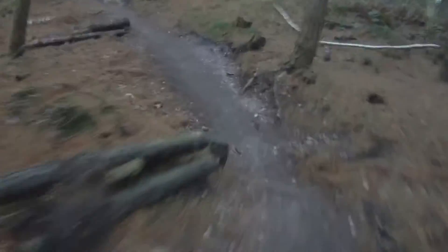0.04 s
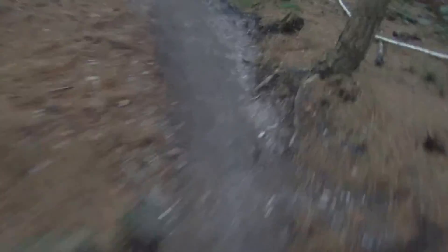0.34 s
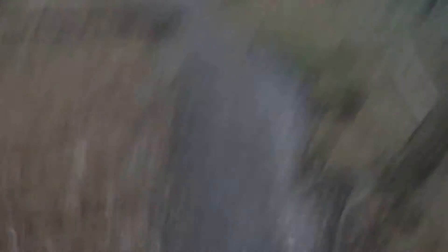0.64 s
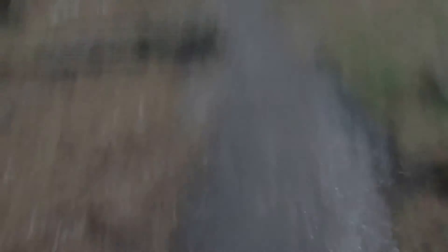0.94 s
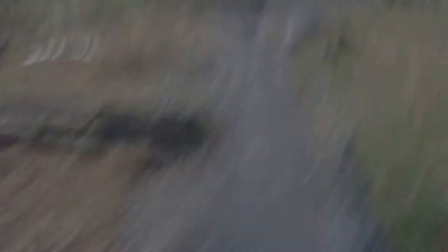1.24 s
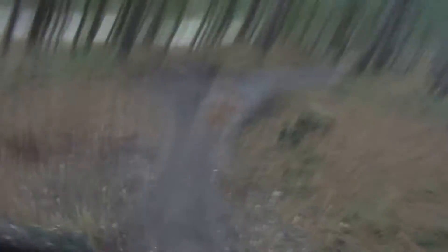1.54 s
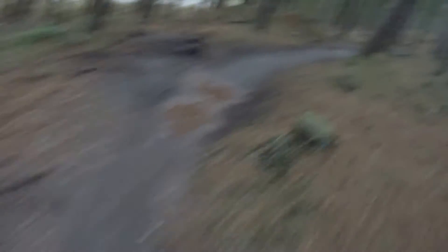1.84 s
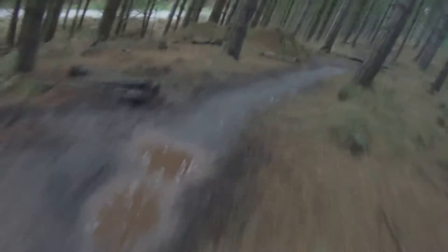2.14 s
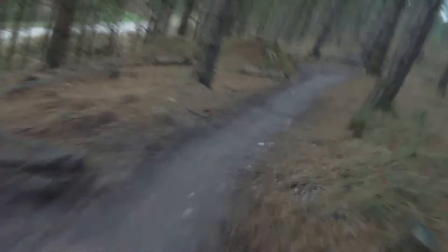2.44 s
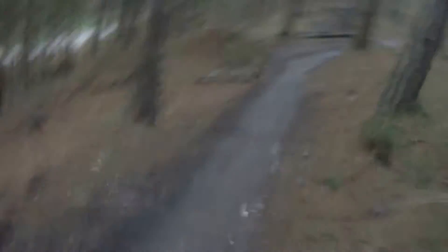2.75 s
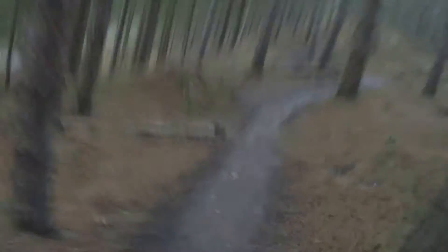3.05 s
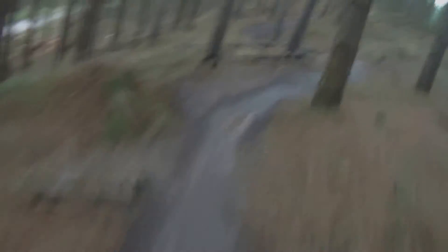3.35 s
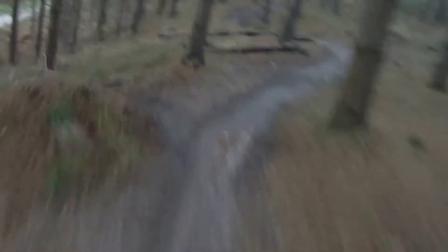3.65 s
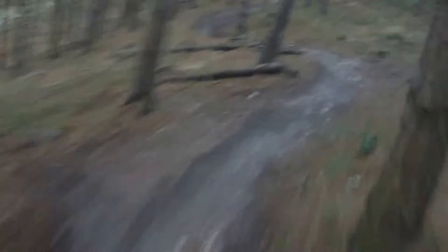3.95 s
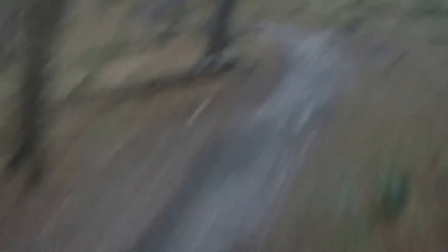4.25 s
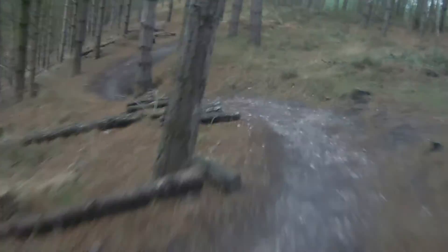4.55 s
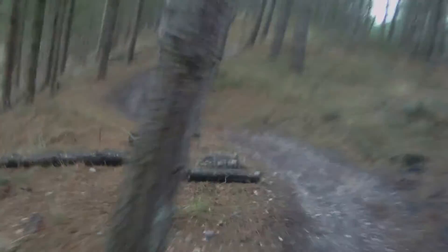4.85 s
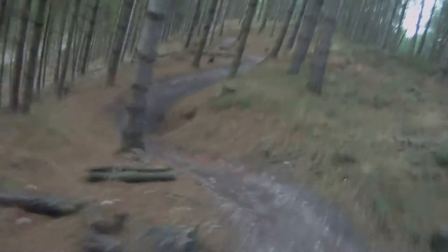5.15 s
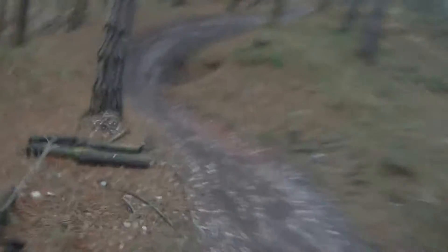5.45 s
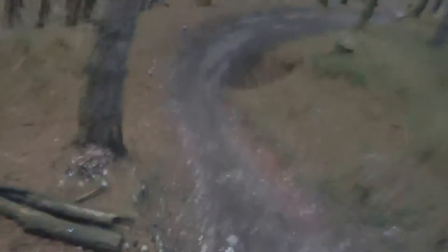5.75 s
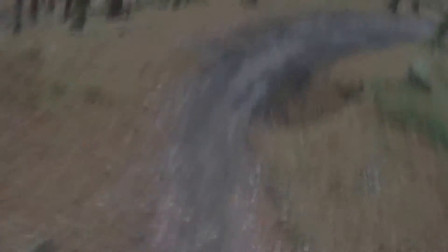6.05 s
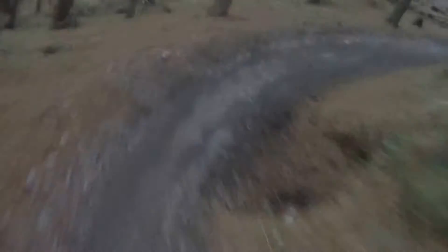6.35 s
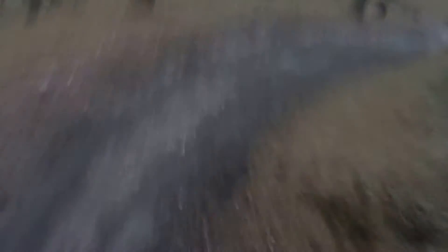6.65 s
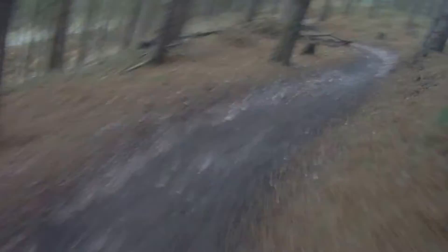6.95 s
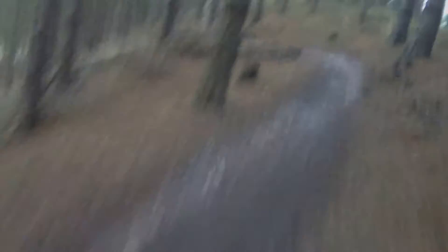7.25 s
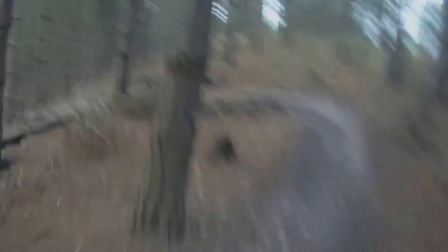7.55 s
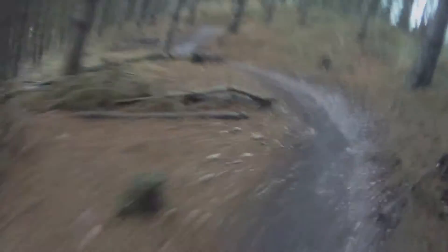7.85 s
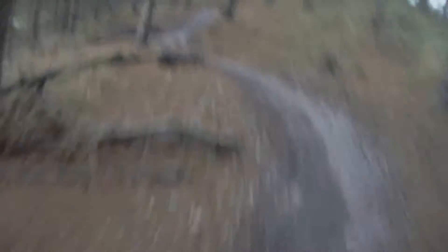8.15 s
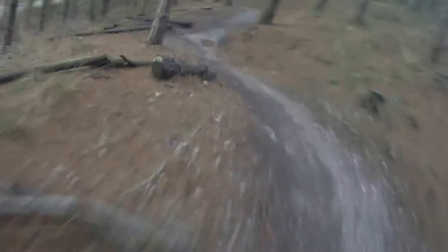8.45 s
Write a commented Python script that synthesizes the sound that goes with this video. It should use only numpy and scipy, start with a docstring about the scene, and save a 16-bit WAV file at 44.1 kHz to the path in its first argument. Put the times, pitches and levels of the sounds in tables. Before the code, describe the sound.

A mountain bike rides fast over a dirt trail, heard from inside a plastic camera housing. Hollow knocks and sharp clacks from the mount come irregularly, each followed by chattering loose parts, over a soft, muffled rumble of tyres and wind with faint gritty hiss.

From about 0.6 to 1.1 seconds comes the loudest clatter, with the chain slapping the frame and jingling brightly. Lighter knocks and jingles continue until 1.8. After a short lull, the tyres scrub through grit at 2.5, and another run of knocks lasts from 2.6 to 3.5. Only lighter, scattered taps follow until about 5.2, when hard knocking returns, densest from 5.8 to 6.6. The rumble swells between 6 and 7.2, with a strong knock at 7.1. Faint grit hiss follows, and a last cluster of clacks runs from about 7.9 to 8.5 seconds.

```python
"""On a dirt trail, a mountain bike runs fast, heard from inside a plastic camera housing on its mount.
Bumps make the mount knock and often rebound; each impact excites the housing's heavily damped modes.
Loose parts chatter after the jolts, and the chain slaps the frame, jingles and rings the sprockets.
Underneath runs broadband noise: the muffled rumble of tyres and wind, and the hiss of grit."""
import sys
import numpy as np
from scipy import signal
from scipy.fft import rfft, irfft
from scipy.io import wavfile
from scipy.ndimage import uniform_filter1d, minimum_filter1d

SR = 44100
rng = np.random.default_rng(int(sys.argv[2]) if len(sys.argv) > 2 else 0)


def int16_out(signal):
    """Quantize to a 16-bit WAV file."""
    q = np.round(np.clip(np.atleast_2d(signal).T, -1, 1) * 32767)
    wavfile.write(sys.argv[1], SR, q.astype(np.int16))


N = 379260

# normal modes of the housing, in three registers: (frequency [Hz], level [dB], decay time T60 [s])
BODY_MODES = [(177, -12.5, 0.088), (470, -20.5, 0.027), (671, -3.5, 0.028), (867, -1, 0.022),
              (1250, -9.5, 0.013), (1438, -1.5, 0.02), (1558, 1, 0.021)]  # low, hollow knock
SHELL_MODES = [(2074, -10.5, 0.02), (2340, -20, 0.032), (2645, -0.5, 0.011), (3080, 0.5, .014),
               (3585, -5, 0.0099), (4380, -6.5, .011)]  # clack
TICK_MODES = [(5104, -1, 0.0088), (6280, -0.5, 0.006), (7360, -2, 0.0047), (8200, -1.5, 0.0053),
              (9180, 0, 0.0034), (11400, -33, 0.004), (13800, -18, 0.0046)]  # bright contact tick


def undb(db):
    """Amplitude ratio of a level in decibels."""
    return 10 ** (np.asarray(db) / 20)


def unit(x):
    """Normalisation to rms 1."""
    return x / np.sqrt(np.mean(x ** 2) + 1e-18)


def band(x, lo_hz, hi_hz, order=2):
    """Causal band-pass filtering."""
    edges_hz = [lo_hz, min(hi_hz, SR / 2 - 1000)]
    return signal.sosfilt(signal.butter(order, edges_hz, "band", fs=SR, output="sos"), x)


def colour(x, points):
    """Spectral shaping by points (frequency [Hz], relative level [dB]), at rms 1."""
    hz, db = np.transpose(points)
    f = np.maximum(np.arange(N // 2 + 1) * SR / N, 1)
    gain = undb(np.interp(np.log(f), np.log(hz), db))
    low_cut = np.minimum(f / hz[0], 1) ** 2
    return unit(irfft(rfft(x) * gain * low_cut, N))


def flicker(rate):
    """Random modulation: values held for 1 / rate seconds and smoothed twice, at rms 1."""
    hold = int(SR / rate)
    steps = np.repeat(rng.standard_normal(N // hold + 1), hold)
    return unit(uniform_filter1d(uniform_filter1d(steps, hold), hold)[:N])


def grains(rate, spread_db):
    """Shot noise: randomly timed impulses of uneven size, at rms 1."""
    impulses = (rng.random(N) < rate / SR) * rng.choice([-1, 1], N)
    return unit(impulses * undb(spread_db * np.clip(rng.standard_normal(N), -2, 2)))


def resonate(x, modes):
    """Forced vibration: x drives resonators (frequency [Hz], peak gain [dB], T60 [s])."""
    out = 0
    for hz, db, t60 in modes:
        radius = undb(-60 / (t60 * SR))
        pole = radius * np.exp(2j * np.pi * hz / SR)
        out = out + undb(db) * 2 * (1 - radius) * signal.lfilter([1], [1, -pole], x).real
    return out


def trail():
    """Transmission and resonance: tyres and wind rumble through the housing; grit sets it humming."""
    # course of the tyre and wind noise: (time [s], relative level [dB])
    ride = [(0.0, -56), (0.57, -60), (0.93, -51), (1.15, -61), (1.41, -58.5), (1.7, -54.5), (2.56, -53.5),
            (3.19, -58), (4.6, -57.5), (4.96, -62.5), (5.87, -60.5), (5.96, -55.5), (6.47, -48.5),
            (7.14, -48.5), (7.86, -55), (8.6, -59.5)]
    # spectra of the rumble and the grit: (frequency [Hz], relative spectral density [dB])
    rumble_spectrum = [(25, -13), (85, -2), (200, -2.5), (400, -3.5), (520, -2), (700, 0.5), (1100, -15.5),
                       (1900, -19.5), (2900, -22.5), (5000, -29.5), (12000, -56)]
    grit_spectrum = [(1000, -6.5), (2700, -1.5), (4200, -1.5), (5100, -5), (6200, 3.5), (7500, -0.5),
                     (9500, -2), (12000, -7.5), (15000, -9)]
    # tyres scrubbing through loose grit: (start [s], duration [s], level [dB])
    scrubs = [(2.505, 0.2, -54), (3.025, .1, -69.5), (4.107, 0.24, -70.5), (4.62, 0.12, -68),
              (7.38, 1, -63)]
    t = np.arange(N) / SR
    ride_db = np.interp(t, *np.transpose(ride))
    rumble = colour(rng.standard_normal(N), rumble_spectrum) * undb(ride_db + flicker(rate=22) + 5)
    grit = colour(rng.standard_normal(N) + 0.55 * grains(rate=520, spread_db=7.5), grit_spectrum)
    grit *= undb(-53.5 + 0.27 * ride_db + 1.2 * flicker(rate=24))  # follows the rumble weakly
    spray = colour(rng.standard_normal(N) + grains(rate=630, spread_db=8.5), grit_spectrum)
    spray *= undb(1.8 * flicker(rate=40))
    attack_s, release_s = 0.03, 0.22
    scrub = np.zeros(N)
    for start, duration, db in scrubs:
        rise = np.clip((t - start) / attack_s, 0, 1)
        fall = np.exp(-np.maximum(t - start - duration, 0) / release_s)
        scrub += undb(db) * rise * fall
    hiss = grit + scrub * band(spray, lo_hz=800, hi_hz=9500, order=1)
    return rumble + hiss + 2.1 * resonate(hiss, BODY_MODES + SHELL_MODES)


def chatter(jolts, rate=200, span_s=0.026, follow=0.77, rest_db=-58.5, spread_db=6, count=2400):
    """Rattling: loose parts tap at random, lightly all the time and harder while each jolt settles."""
    span = int(span_s * SR)
    power = uniform_filter1d(uniform_filter1d(jolts ** 2, span), span)
    # delayed, since the parts are thrown up first and land later
    power = np.abs(np.pad(power, (span // 2, 0))[:N]) + undb(rest_db) ** 2
    scatter = rng.standard_normal((count, 3))
    times = np.cumsum(rng.exponential(1 / rate, count))
    shake_db = follow * 10 * np.log10(np.interp(times, np.arange(N) / SR, power))
    tap_db = shake_db + spread_db * np.clip(scatter[:, 0], -2, 2)
    levels = tap_db[:, None] + [-29, -34, -39] + 2 * scatter  # body, shell, tick
    return housing(np.column_stack([times, levels])[times < N / SR])


def rings(modes, count, scatter_db, detune, crack, crack_t60, band_hz):
    """Free decay, one per blow: each contact point weights the modes anew and adds a noisy crack."""
    t = np.arange(2048) / SR
    ring = np.zeros((count, len(t)))
    for k, (hz, db, t60) in enumerate(modes):
        size, shift, phase = rng.standard_normal((count, 3)).T[:, :, None]
        # neighbouring modes start in opposite directions, so the ring takes a moment to build
        swing = (-1) ** k * np.cos(2 * np.pi * hz * (1 + detune * shift) * t + 0.46 * phase)
        ring += undb(db + scatter_db * size - 60 * t / t60) * swing
    noise = rng.standard_normal(ring.shape) * undb(-60 * t / crack_t60)
    ring = unit(band(ring, *band_hz)) + crack * unit(band(noise, *band_hz))
    energy = np.sum(ring ** 2, axis=1, keepdims=True)
    return ring / np.sqrt(energy / (SR / 200))  # the energy of 5 ms at rms 1


def housing(blows):
    """Modal superposition: blows (time [s], body [dB], shell [dB], tick [dB]) ring the housing."""
    times, body_db, shell_db, tick_db = np.transpose(blows)
    count = len(times)
    body = rings(BODY_MODES, count, scatter_db=2.2, detune=0.029,
                 crack=0.22, crack_t60=0.023, band_hz=(387, 1750))
    shell = rings(SHELL_MODES, count, scatter_db=2.2, detune=0.033,
                  crack=0.3, crack_t60=0.02, band_hz=(1800, 4730))
    tick = rings(TICK_MODES, count, scatter_db=4.5, detune=0.035,
                 crack=0.31, crack_t60=0.0081, band_hz=(4500, 13200))
    # a contact with little tick is a soft one: it loses its very top
    soft = np.clip((shell_db - tick_db) / 12, 0, 1)[:, None]
    tick = (1 - soft) * tick + soft * np.sqrt(2) * uniform_filter1d(tick, size=3, axis=1)
    sounds = body * undb(body_db)[:, None] + shell * undb(shell_db)[:, None]
    sounds += tick * undb(tick_db)[:, None]
    out = np.zeros(N + sounds.shape[1])
    for start, sound in zip(np.clip(times * SR, 0, N - 1).astype(int), sounds):
        out[start:start + len(sound)] += sound
    return out[:N]


def contact(times, strength_db, hardness_db, hollow_db=0):
    """Energy partition among modes: light blows are mostly hollow body, strong ones mostly clack."""
    body_db = -11.5 + 0.61 * strength_db + hollow_db
    return np.column_stack([times, body_db, strength_db, strength_db + hardness_db])


def mount_blows():
    """Impact and elastic rebound: the mount hits its stop, and at times the opposite stop just after."""
    # knocks of the mount: (time [s], strength [dB], tick over shell [dB], rebound delay [ms])
    knocks = [(0.259, -52, -25, -0.5), (0.5755, -22.5, -4, 6.5), (0.594, -35, -7, 0), (0.704, -17, -22, 0),
              (0.7245, -38, -15, 0), (0.8301, -17, -8, 0), (0.8598, -12.5, -11.5, 0), (0.8799, -30, -12, 0),
              (0.889, -16.5, -21.5, 0), (0.957, -27, 5.5, 0), (0.9887, -12, -3.5, 0),
              (0.9998, -18, -15, 4.5), (1.0561, -4.5, -4.5, 4), (1.068, -20, -9, 0), (1.1027, -11.5, -8, 5),
              (1.2595, -33.5, -18, 7.5), (1.2987, -43.5, -2, 0), (1.4182, -34, -16, 0),
              (1.4437, -28, 2, 1.5), (1.455, -35, -11, 0), (1.5266, -23, -16, 6.5), (1.584, -23.5, -6.5, 6),
              (1.6064, -28, -1.5, 0), (1.7681, -21, -18, 0), (1.7723, -16, -10.5, 1),
              (1.7883, -30, -1.5, 0), (1.9467, -44, -5.5, 0), (2.0449, -32, 2, 0),
              (2.6184, -31.5, -27.5, 0), (2.6344, -24, -5, 0), (2.6395, -12, -7.5, 0),
              (2.6571, -29, -26, 0), (2.7059, -41, -2, 0), (2.7934, -26.5, -33, 0), (2.8135, -22, -31, 0),
              (2.8421, -34.5, -18.5, 9.5), (2.882, -21, -5.5, 0), (3.0035, -22.5, -9, 0),
              (3.0221, -21, -24, 5), (3.0687, -44, -3, 0), (3.1242, -26.5, -28.5, 0.5),
              (3.2714, -39, -6.5, 0), (3.41, -33.5, -7.5, 0), (3.4207, -23, -9, 0), (3.4463, -30, -20, 0),
              (3.4545, -25, -16, 6.5), (3.51, -25.5, -28, 0), (3.5208, -21.5, -10.5, 0),
              (3.7243, -48.5, 1.5, 2), (3.7578, -42, -2.5, 0), (4.0849, -36, 1, 0.5),
              (4.4164, -41.5, -5.5, 0), (4.4496, -41.5, -22, 0), (4.5085, -46, -7, 0),
              (4.5588, -32, -19, 0), (4.572, -33, -6.5, 0.5), (4.7768, -34, -1.5, 0),
              (4.8047, -33, -4.5, 0), (4.9773, -45, -24.5, 0), (5.0745, -44.5, -9, 1),
              (5.1916, -36, -32, 0), (5.2045, -40.5, -22, 0), (5.2313, -28.5, -18.5, 7),
              (5.2693, -18.5, -27.5, 3.5), (5.3181, -20, -6.5, -0.5), (5.3359, -40, -20, -0.5),
              (5.3542, -20.5, -13, 6), (5.3966, -47, 1.5, 0), (5.4657, -35, -2.5, -1.5),
              (5.7184, -36.5, -28, 0), (5.7559, -33.5, -4, 0), (5.806, -10.5, -8, 5.5),
              (5.8448, -29.5, 0.5, 0.5), (5.8622, -29.5, -20, 0), (5.9067, -27.5, -6.5, 0),
              (5.9247, -15, -12, 5), (5.9804, -12.5, -7.5, 4.5), (6.02, -33, 1.5, 0.5),
              (6.105, -29, -10, 0), (6.1271, -12.5, -8, 3.5), (6.1741, -29, -0.5, 5.5),
              (6.1913, -26.5, -11, 0), (6.2117, -35, -18, 0), (6.2224, -18.5, -26, 5.5),
              (6.2605, -29.5, -3, 0), (6.304, -20.5, -11, 4.5), (6.3305, -30.5, -19, 0),
              (6.3433, -35, -8.5, 0), (6.4446, -30, -5.5, 4), (6.512, -43, -0.5, 1), (6.565, -18.5, -17, 0),
              (6.5998, -22.5, -4.5, -1), (7.0182, -35.5, -3, -1), (7.1158, -13, -11, 0),
              (7.1364, -21, -25, 5), (7.1518, -38, -24, -0.5), (7.1681, -35, -1.5, 0),
              (7.2242, -24.5, -28.5, 0.5), (7.488, -36.5, -6.5, 0), (7.5693, -42.5, -2.5, -1.5),
              (7.9473, -16, -4.5, 9), (7.9662, -22, -28, 1), (7.9943, -25.5, -3.5, 0),
              (7.9978, -14.5, -11, 0), (8.032, -31.5, -2, 0), (8.048, -29, -19, 4.5), (8.1374, -44, -3, 0),
              (8.2183, -29, -1.5, -1.5), (8.2501, -16.5, -13, 5.4), (8.2848, -31.5, 1.5, 0),
              (8.4213, -25.5, -11, 0), (8.4362, -28.5, -2.5, 0), (8.5939, -37, -6, 0)]
    times, strength_db, hardness_db, delay_ms = np.transpose(knocks)
    rebound_db = -12.5 + 0.66 * strength_db
    rebounds = contact(times + delay_ms / 1000, rebound_db, hardness_db=-3, hollow_db=2.5)
    return np.vstack([contact(times, strength_db, hardness_db), rebounds[delay_ms > 1]])


def frame_thud(blows, hz=135, t60=0.04):
    """Damped oscillation: each blow also pushes the frame, which answers with a faint, low thud."""
    times, body_db = blows[:, :2].T
    push = np.zeros(N)
    push[np.clip(times * SR, 0, N - 1).astype(int)] = undb(body_db - 21)
    t = np.arange(int(t60 * SR)) / SR
    swing = np.sin(2 * np.pi * hz * t) * undb(-60 * t / t60)
    return band(signal.fftconvolve(push, swing)[:N], lo_hz=90, hi_hz=400)


def chain_slaps():
    """Hard impact: the chain hits the frame and excites mostly the highest modes."""
    # slaps of the chain: (time [s], level [dB])
    slaps = [(0.6081, -26.5), (0.616, -37.5), (0.6553, -13), (0.666, -23.5), (0.684, -19.5), (0.695, -28.5),
             (0.7015, -17.5), (0.733, -35), (0.7426, -29), (0.8847, -20), (0.898, -28.5), (0.9128, -19.5),
             (0.929, -35.5), (0.945, -32), (0.9654, -30), (0.9782, -23.5), (1.043, -26.5), (1.089, -36),
             (1.6412, -31), (1.6678, -34), (6.06, -42)]
    times, tick_db = np.transpose(slaps)
    body_db, shell_db = tick_db - 22, tick_db - 9.5
    return housing(np.column_stack([times, body_db, shell_db, tick_db]))


def chain_jingle(ramp_s=0.0066, click_decay_s=0.00044):
    """Random collisions: links click together in quick, bright runs, each click a tiny noise burst."""
    # spells of chain shaking: (start [s], end [s], level [dB])
    shakes = [(0.625, 0.654, -44), (0.72, 0.784, -43.5), (.9, 0.974, -43), (1.025, 1.075, -33),
              (1.343, 1.4, -56.5), (1.487, 1.509, -39.5), (1.554, 1.684, -47), (3.065, 3.172, -55),
              (8.33, 8.386, -55.5)]
    t = np.arange(N) / SR
    shake = sum(undb(db) * np.clip(np.minimum(t - start, end - t) / ramp_s, 0, 1)
                for start, end, db in shakes)
    clicks = np.abs(grains(rate=380, spread_db=3))
    bursts = signal.lfilter([1], [1, -np.exp(-1 / (click_decay_s * SR))], clicks)
    links = rng.standard_normal(N) * bursts
    return shake * unit(band(links + resonate(links, TICK_MODES), lo_hz=4480, hi_hz=12500))


def sprockets(chain):
    """Sympathetic resonance: the chain sets the sprockets ringing."""
    # sprocket modes: (frequency [Hz], peak gain [dB], decay time T60 [s])
    sprocket_modes = [(3800, 2, 0.073), (4200, 2.5, .012)]
    return resonate(chain, sprocket_modes)


def scene():
    """Superposition: all sound reaches the microphone through the housing, so both channels are alike."""
    blows = mount_blows()
    knocks = housing(blows)
    slaps = chain_slaps()
    loose_parts = chatter(knocks + slaps)
    chain = slaps + chain_jingle()
    mono = knocks + frame_thud(blows) + loose_parts + chain + sprockets(chain) + trail()
    return np.array([mono, mono])


def record(dry, top_hz=15400):
    """Peak limiting: a very fast limiter holds the hardest knocks at full scale; the top is then cut."""
    gain = 1 / np.maximum(np.abs(dry), 1)
    gain = uniform_filter1d(minimum_filter1d(gain, size=13), size=13)
    low_pass = signal.ellip(8, 0.2, 70, top_hz, fs=SR, output="sos")
    return signal.sosfilt(low_pass, dry * gain)


dry = scene()
out = record(dry)
int16_out(out)
```